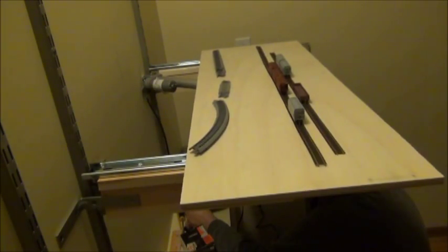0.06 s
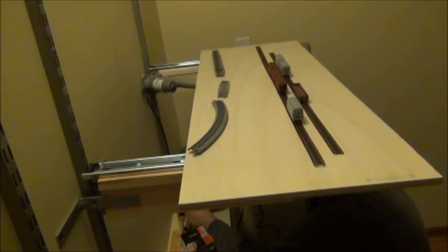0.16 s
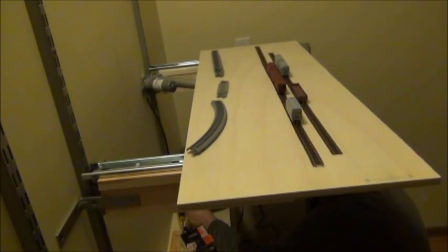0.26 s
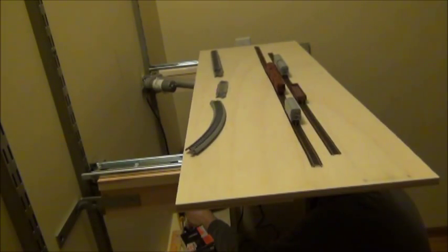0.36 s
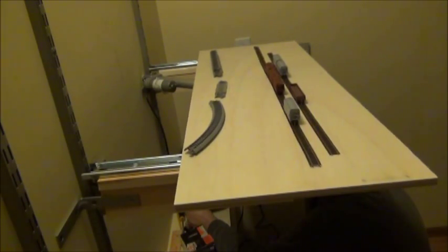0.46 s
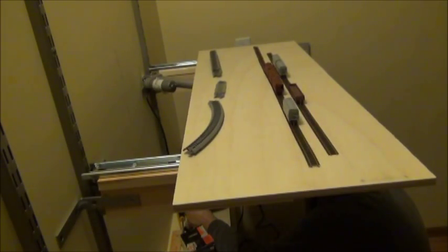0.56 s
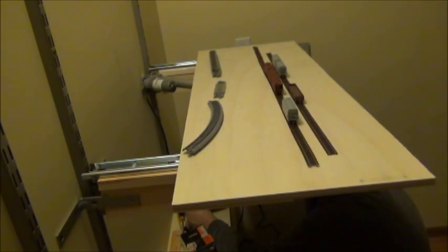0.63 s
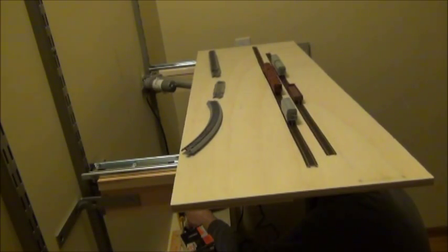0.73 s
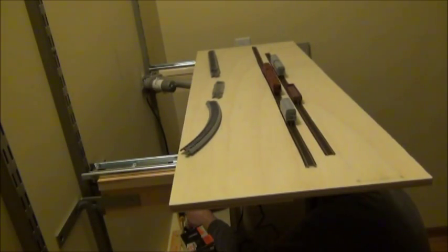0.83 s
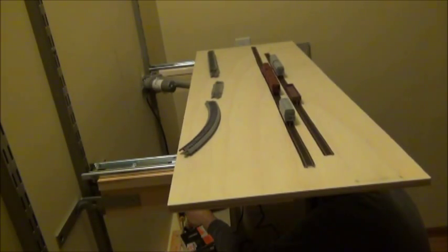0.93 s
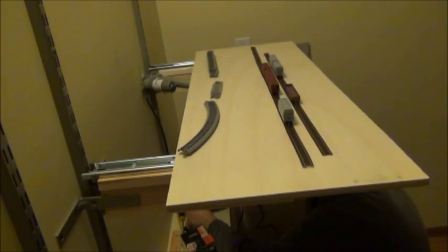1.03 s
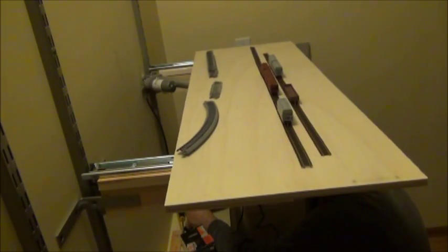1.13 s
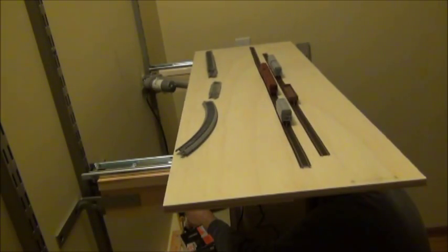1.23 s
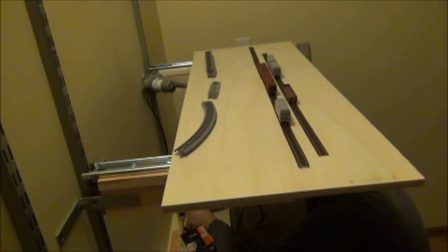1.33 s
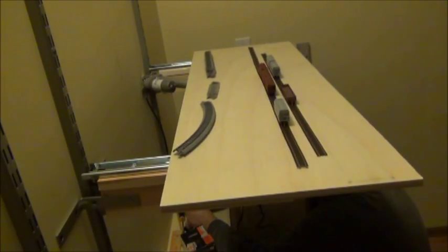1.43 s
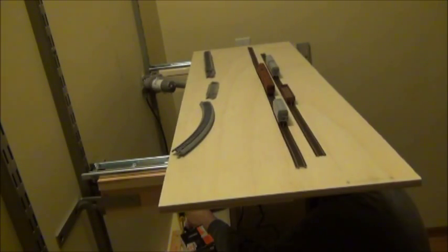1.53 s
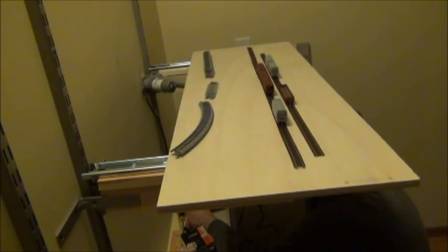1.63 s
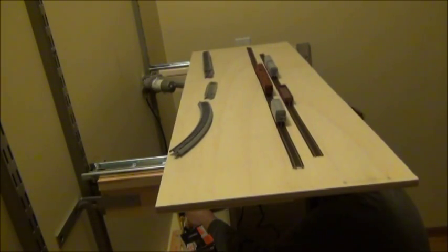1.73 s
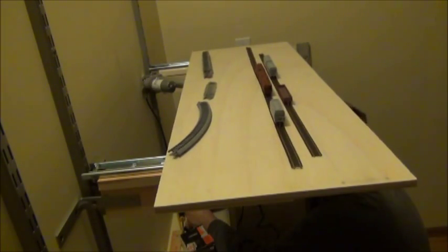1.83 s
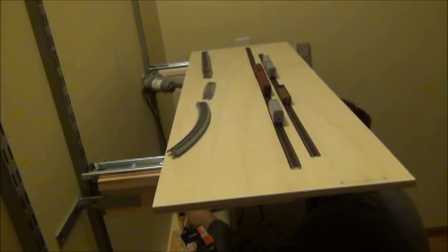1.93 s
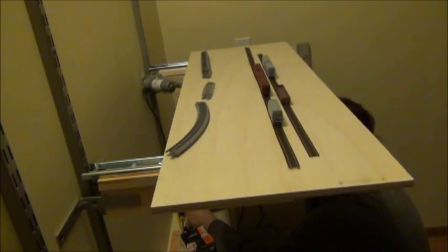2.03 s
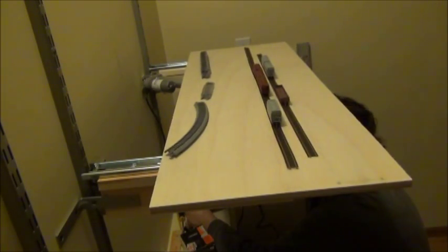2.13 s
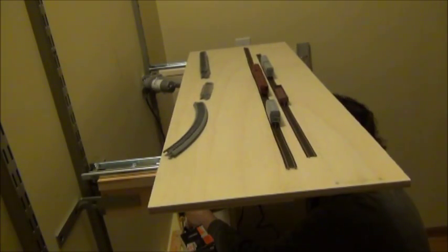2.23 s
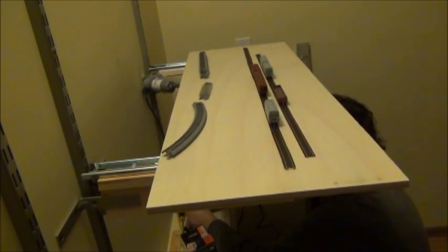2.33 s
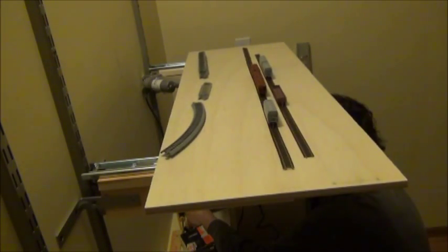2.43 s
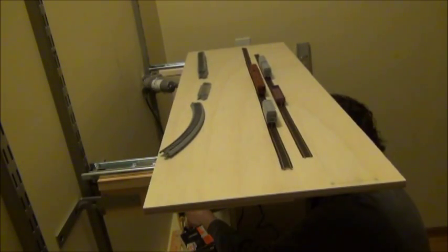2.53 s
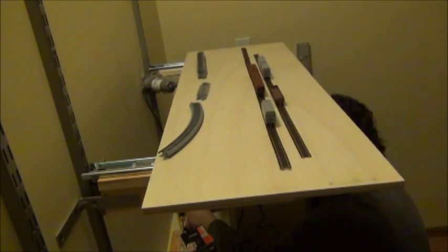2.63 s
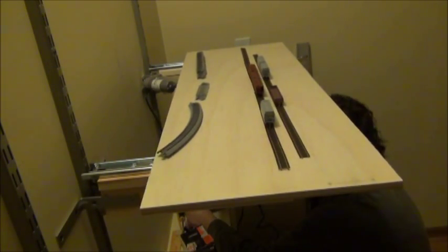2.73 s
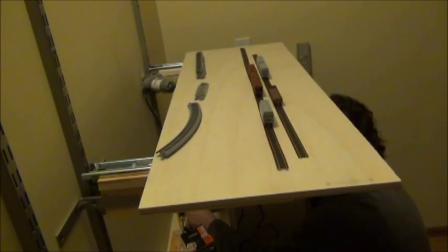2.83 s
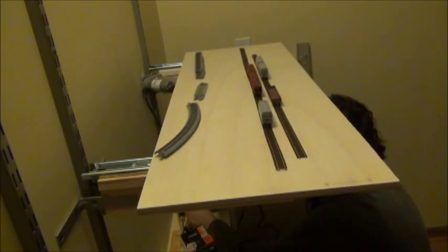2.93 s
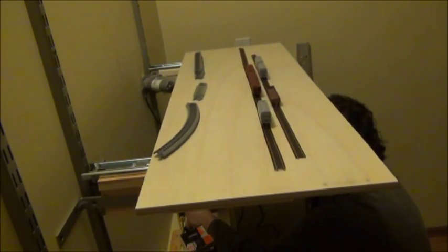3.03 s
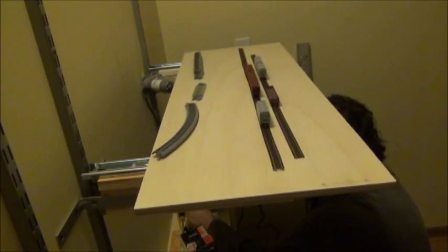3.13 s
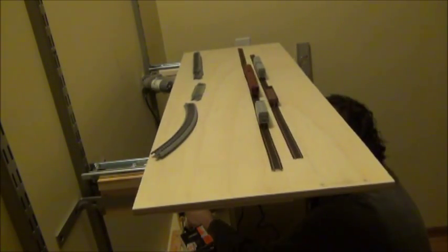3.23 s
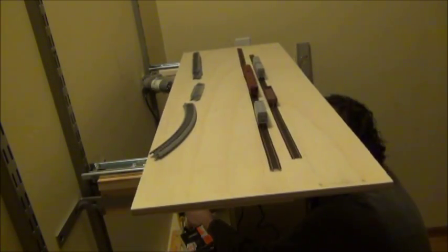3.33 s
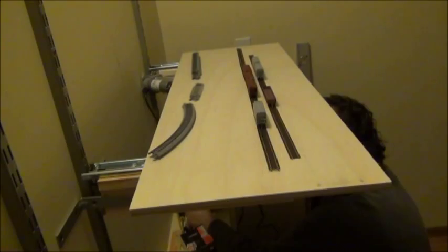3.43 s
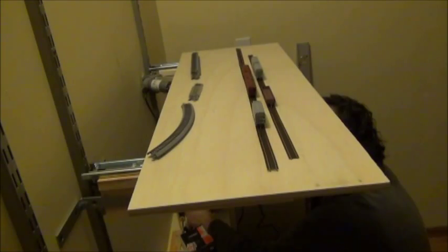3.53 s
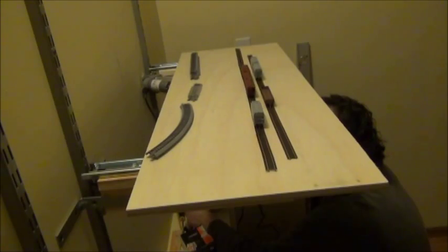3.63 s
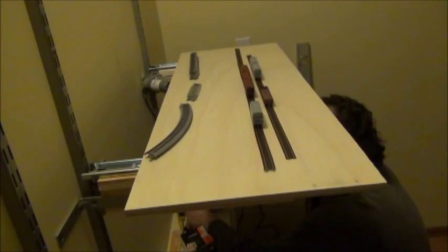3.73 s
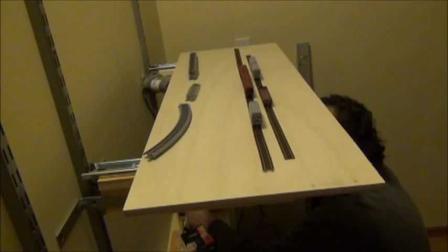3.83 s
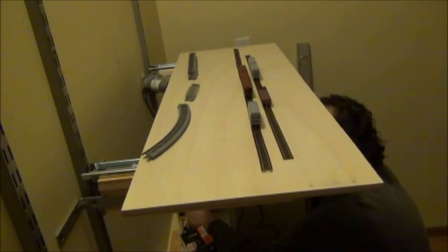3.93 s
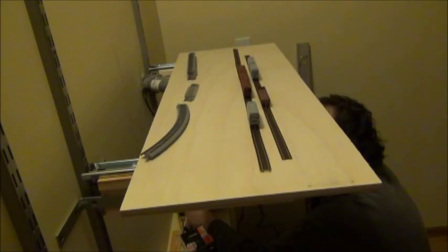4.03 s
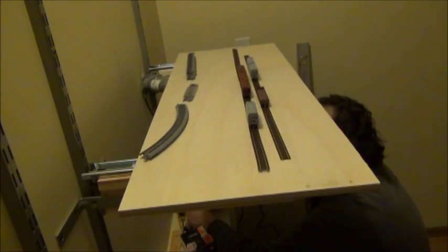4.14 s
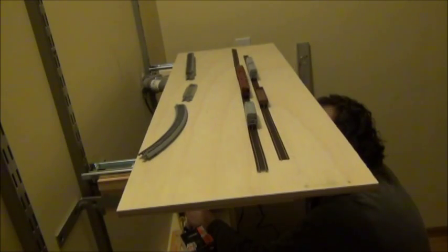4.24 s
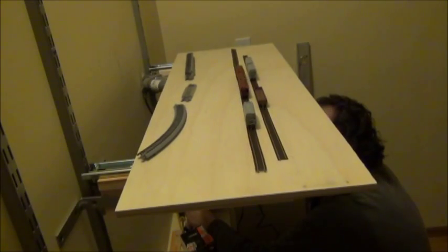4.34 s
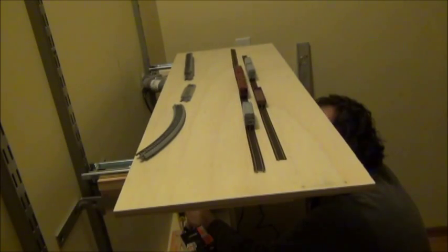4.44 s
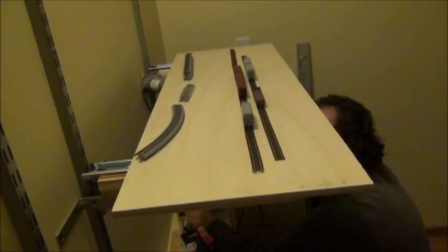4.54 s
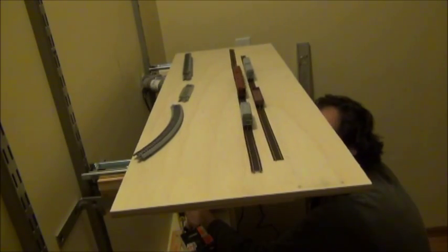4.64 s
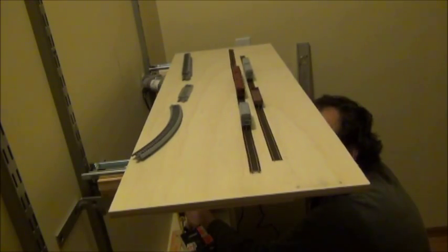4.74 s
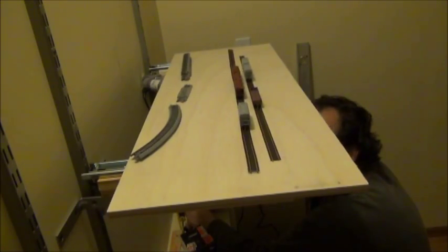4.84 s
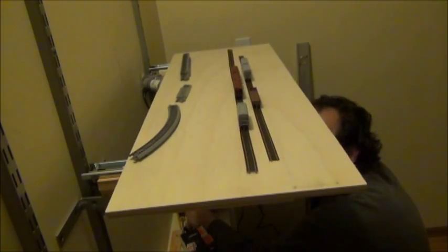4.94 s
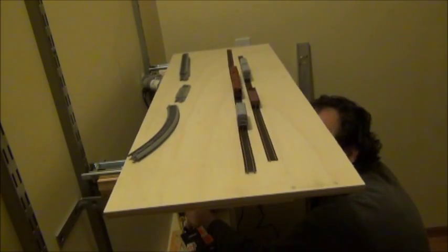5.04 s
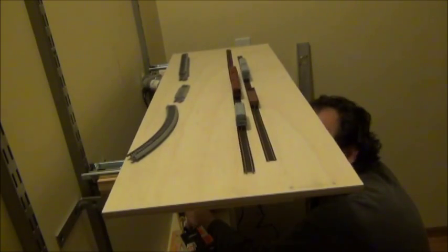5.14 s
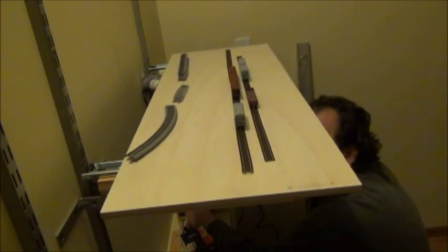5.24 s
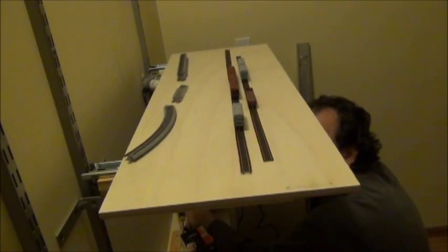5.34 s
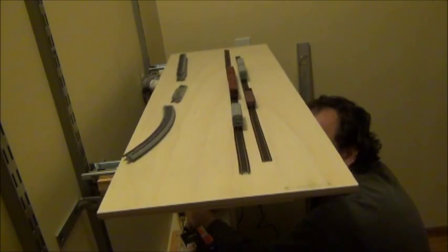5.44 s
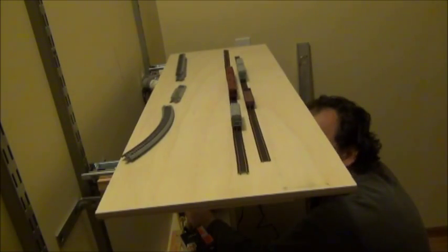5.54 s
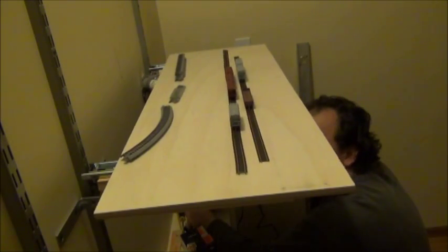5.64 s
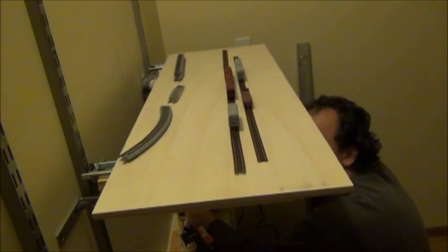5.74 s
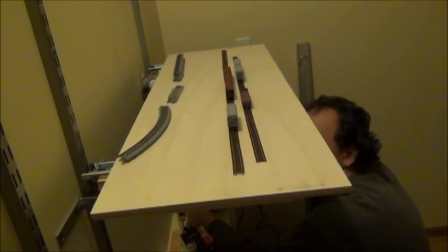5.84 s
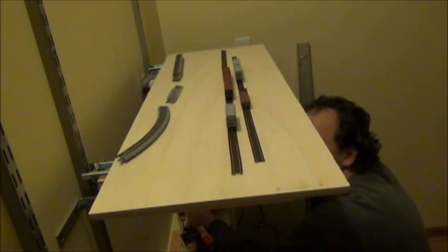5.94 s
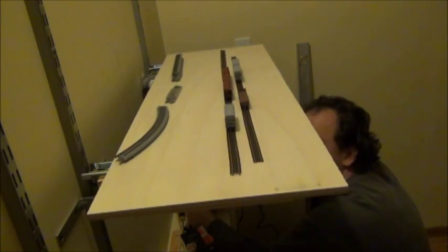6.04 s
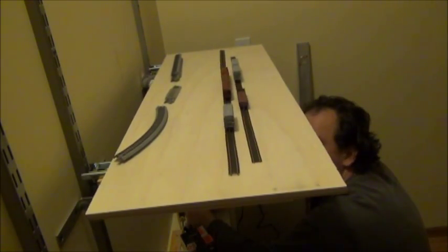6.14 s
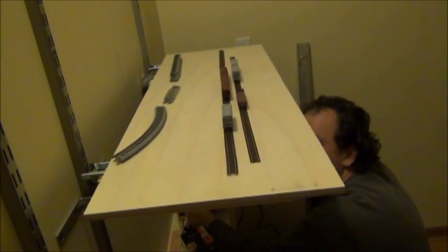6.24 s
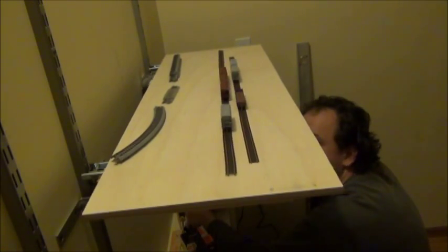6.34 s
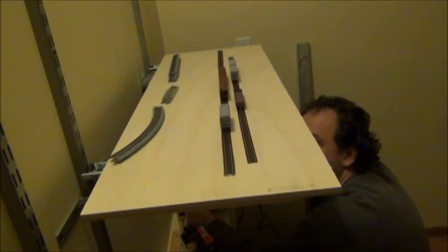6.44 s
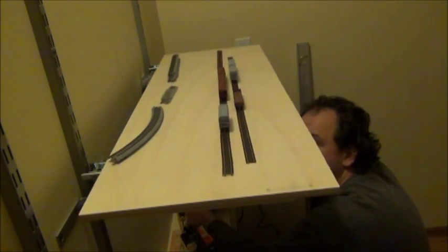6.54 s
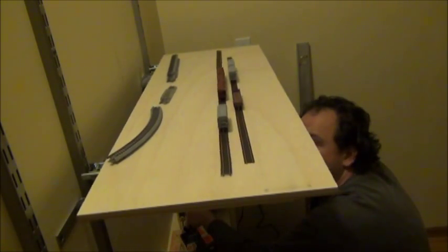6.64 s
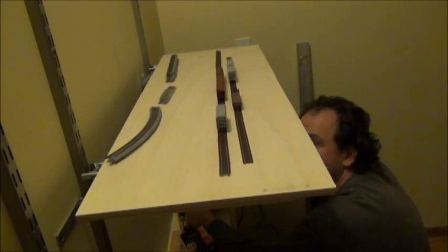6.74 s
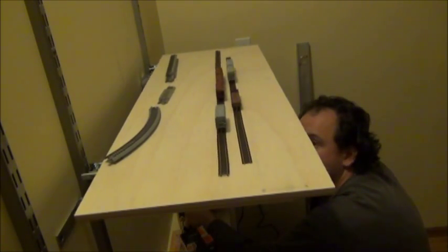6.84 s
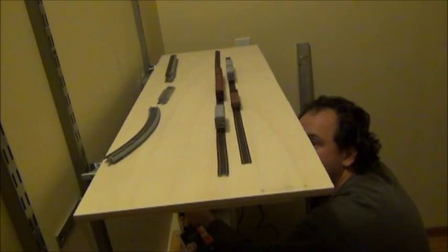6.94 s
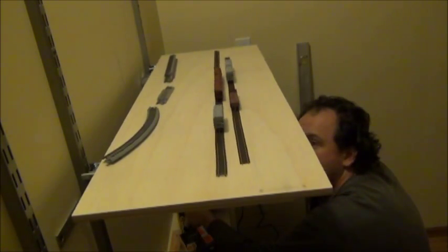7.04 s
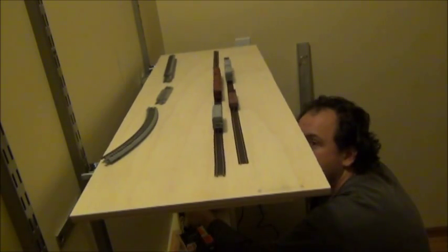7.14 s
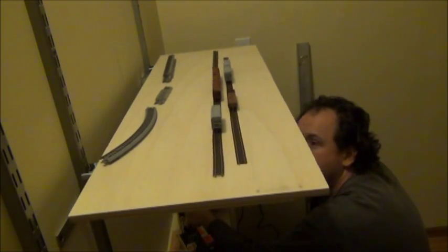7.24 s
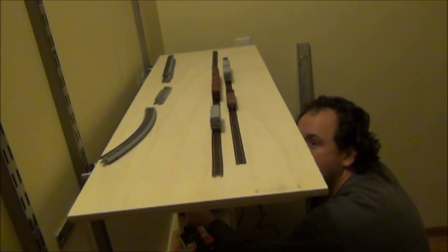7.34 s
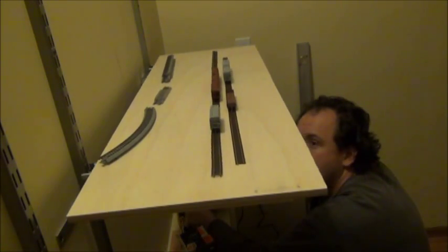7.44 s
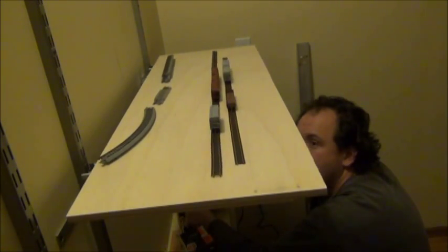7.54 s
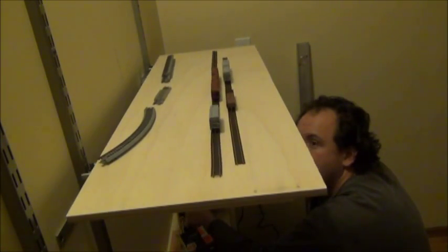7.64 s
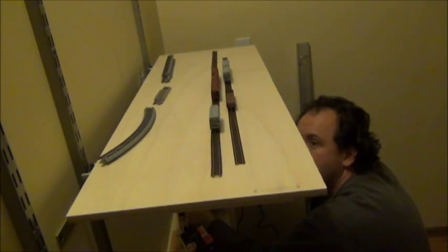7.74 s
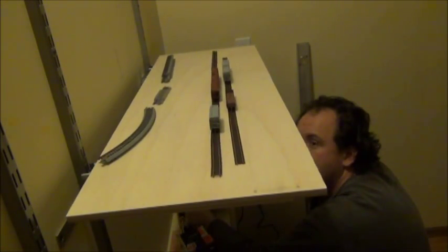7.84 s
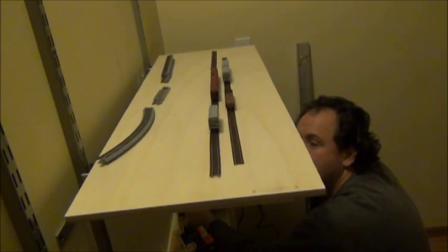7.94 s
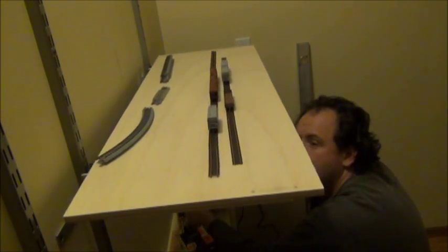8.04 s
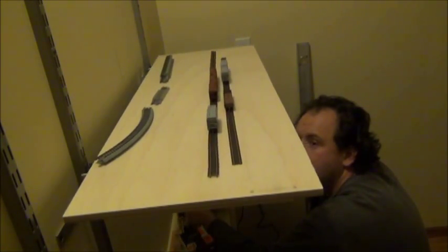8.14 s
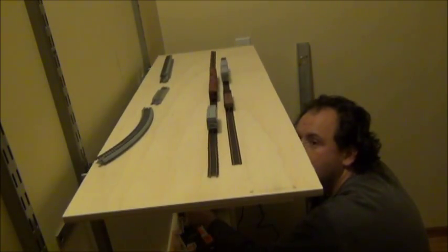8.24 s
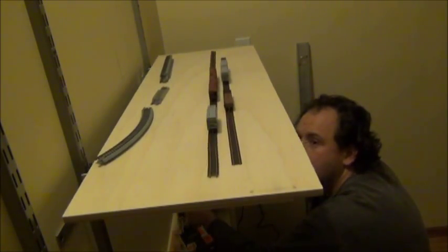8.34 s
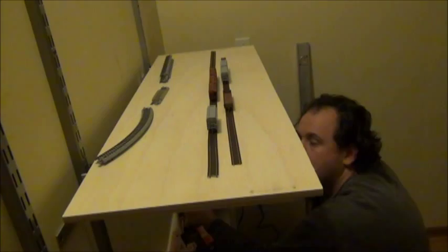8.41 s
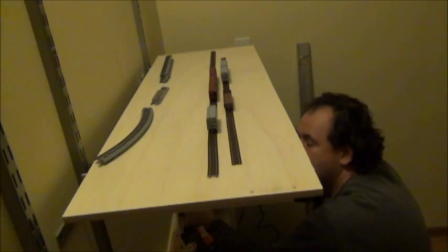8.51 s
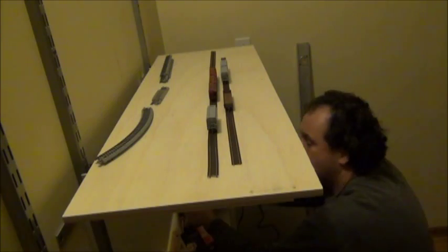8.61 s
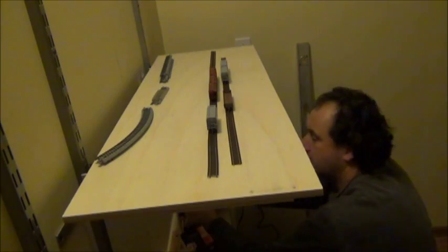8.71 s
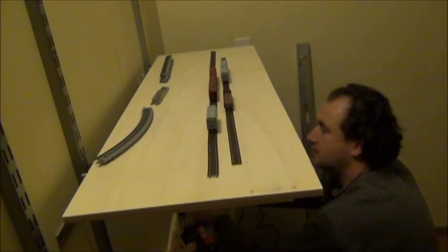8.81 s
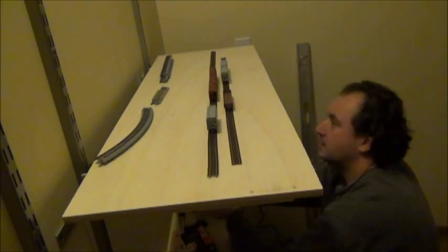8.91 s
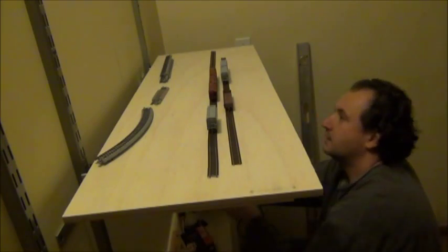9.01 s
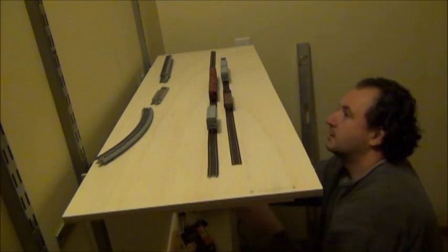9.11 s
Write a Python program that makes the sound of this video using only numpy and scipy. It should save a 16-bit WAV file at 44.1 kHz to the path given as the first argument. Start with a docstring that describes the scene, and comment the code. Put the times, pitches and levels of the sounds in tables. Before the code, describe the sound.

A small geared electric motor whines steadily, coasts down with a rattle, then gives two short bursts as a wooden drawer stops.

```python
"""A small room: a geared electric motor turns a lead screw and draws a wooden drawer in.
Everything that turns repeats with the shaft, so the whine is a comb of shaft orders over brush and
gear hiss. The switch is let go and pressed again twice; each time the motor coasts down, its loose
gears rattling. The drawer thuds softly as the screw halts, and a small scuff comes last."""
import sys
import numpy as np
from scipy import signal
from scipy.fft import rfft, irfft
from scipy.io import wavfile
from scipy.ndimage import uniform_filter1d, map_coordinates

SR = 44100
rng = np.random.default_rng(int(sys.argv[2]) if len(sys.argv) > 2 else 0)


def digitize_waveform(pressure):
    """Quantize a signal to 16-bit integers and store it at the path in sys.argv[1].

    Rows of a 2-D input are taken as channels; values are limited to [-1, 1].
    """
    field = np.atleast_2d(pressure).T
    bounded = np.clip(field, -1, 1)
    quanta = np.round(bounded * 32767).astype(np.int16)
    wavfile.write(sys.argv[1], SR, quanta)


N = 404378
T = np.arange(N) / SR
START_SPEED_HZ, END_SPEED_HZ = 57.42, 57.27   # running shaft speed sags as the drawer comes in
GEAR_TURNS = 5   # shaft turns before the gear pattern repeats


def amp(db):
    """Decibels to gain."""
    return 10 ** (np.asarray(db) / 20)


def rms_one(x):
    """Scale each channel to rms 1."""
    return x / np.sqrt(np.mean(x ** 2, axis=-1, keepdims=True) + 1e-20)


def curve_db(points, hz):
    """Read an EQ curve on a log-frequency axis."""
    points = np.array(points, float)
    return np.interp(np.log(np.maximum(hz, 1)), np.log(points[:, 0]), points[:, 1])


def peaks_db(peaks, hz):
    """Sum of resonance peaks."""
    return sum(db / (1 + (2 * (hz - centre) / width) ** 2) for centre, width, db in peaks)


def butter(x, order, edges_hz, kind):
    """Butterworth filter."""
    return signal.sosfilt(signal.butter(order, edges_hz, kind, fs=SR, output="sos"), x)


def colour(x, db_at):
    """Minimum-phase EQ with the given dB curve; one row per channel."""
    cepstrum = irfft(db_at(np.fft.rfftfreq(8192, 1 / SR)) * np.log(10) / 20)
    cepstrum[1:4096] *= 2
    cepstrum[4097:] = 0
    impulse = irfft(np.exp(rfft(cepstrum)))
    return signal.oaconvolve(np.atleast_2d(x), impulse[None], axes=1)[:, :N]


def drift(rate_hz):
    """Smooth random wander, spread about 1."""
    return map_coordinates(rng.standard_normal(2000), [T * rate_hz], order=3, mode="wrap")


def room_tone(level_db=-50.5, side_db=-7.5):
    """A quiet bed of air and microphone noise, mono in the bass."""
    # Colour of the bed: frequency_hz, relative_db
    air_eq = [(18, -40), (30, -14), (164, -6), (192, -3), (341, -5.5), (852, -5.5), (2300, -13),
              (7080, -19.5), (13600, -20), (15500, -15)]
    air = colour(rng.standard_normal((2, N)), lambda hz: curve_db(air_eq, hz))
    mid, side = amp(level_db) * rms_one(air)
    return mid + amp(side_db) * butter(side, 2, 130, "high") * [[1], [-1]]


def room_reverb(x, t60_s=.52, mid_db=-15.0):
    """Two unrelated diffuse tails: one sits in the centre, the other gives the stereo width."""
    # Side tail against the direct sound: frequency_hz, gain_db
    side_eq = [(60, -26), (110, -34), (200, -38), (380, -19.5), (700, -22.5), (1290, -12.5), (2380, -14.5),
               (4400, -13.5), (8120, -8), (15000, -13.5)]
    t = T[:SR // 2]
    tails = rng.standard_normal((2, len(t))) * amp(-60 * t / t60_s) * (t > .004)
    mid, wide = signal.oaconvolve(x[None], rms_one(tails) / np.sqrt(len(t)), axes=1)[:, :N]
    side = colour(wide, lambda hz: curve_db(side_eq, hz))[0]
    return amp(mid_db) * mid + side * [[1], [-1]]


def scuff(start_s=8.904, length_s=.17, dull_db=-55.0, bright_db=-42.5):
    """A short brushing sound in two noise bands: sharp attack, then dying away."""
    envelope = (T >= start_s) * np.clip(1 - (T - start_s) / length_s, 0, 1) ** 1.6
    out = 0
    for db, edges_hz in ((dull_db, [300, 2000]), (bright_db, [1500, 13000])):
        band = butter(rng.standard_normal(N), 1, edges_hz, "band")
        out = out + rms_one(band) * amp(db) * envelope
    return out


def drawer_thud(start_s=7.715, pitch_hz=224, gain_db=-36.0, attack_s=.012, t60_s=.15):
    """The drawer thuds as the screw halts: one low damped note with a rounded attack."""
    t = np.maximum(T - start_s, 0)
    envelope = amp(gain_db - 60 * t / t60_s) * (1 - np.exp(-t / attack_s))
    return envelope * np.sin(2 * np.pi * pitch_hz * t)


def body_db(hz):
    """Colour that housing, drawer and microphone give the hiss."""
    # Broad hiss spectrum at full speed: frequency_hz, level_db_per_hz
    body_eq = [(25, -86), (45, -84), (70, -86), (150, -80), (300, -73), (750, -70), (1400, -76),
               (1900, -70.5), (3500, -72), (4100, -76), (5200, -77), (6200, -72), (7600, -75.5),
               (8400, -69), (11500, -68.5), (13000, -73.5), (15800, -83)]
    # Housing resonances: centre_hz, width_hz, boost_db
    housing_modes = [(230, 30, 6.5), (455, 40, 4), (560, 60, 3), (740, 70, 5), (910, 50, 3),
                     (1010, 50, 1.5), (1870, 100, 2), (2360, 120, 1.5), (2730, 80, 7), (3450, 160, 3),
                     (6300, 100, 1), (6800, 100, 4.5), (8200, 150, 3), (9600, 150, 3), (10700, 150, 1)]
    return curve_db(body_eq, hz) + peaks_db(housing_modes, hz)


def path_db(hz):
    """Colour of the path that carries whine and rattle out of the housing."""
    # Broad response of the path: frequency_hz, gain_db
    path_eq = [(60, -30), (180, -27), (300, -18), (800, -12), (1200, -14), (1600, -16), (1850, 2),
               (3650, -2.5), (3900, -15), (4150, -5.5), (5000, -10), (6300, -1.5), (7500, -10), (8500, -3),
               (12000, -3), (14000, -10)]
    # Narrow resonances of drawer and frame: centre_hz, width_hz, boost_db
    frame_modes = [(226, 18, 20), (345, 24, 8), (457, 18, 17), (688, 30, 8), (915, 30, 10), (1010, 25, 15),
                   (1900, 100, 4), (2380, 100, 4), (2750, 70, 9), (3440, 90, 6), (6300, 120, 6),
                   (6850, 100, 5), (8350, 120, 6), (9620, 120, 6), (10700, 150, 5)]
    return curve_db(path_eq, hz) + peaks_db(frame_modes, hz)


def motor_motion(spin_up_s=.023, sag_s=3.0):
    """Spin-ups and coast-downs: pace (share of full speed), shaft speed in Hz, and power (0 to 1)."""
    # Switch presses: on_s, off_s, coasting_loss_hz_per_s
    presses = [(-1.0, 6.861, 136), (7.106, 7.322, 133), (8.021, 8.13, 150)]
    full_hz = END_SPEED_HZ + (START_SPEED_HZ - END_SPEED_HZ) * np.exp(-T / sag_s)
    speed_hz, power = np.zeros(N), np.zeros(N)
    for on, off, loss in presses:
        from_hz = speed_hz[max(int(on * SR), 0)]
        driven_hz = full_hz - (full_hz - from_hz) * np.exp(-np.clip(T - on, 0, off - on) / spin_up_s)
        lost_hz = loss * np.maximum(T - off, 0)
        speed_hz = np.where(T >= on, np.maximum(driven_hz - lost_hz, 0), speed_hz)
        power[(T >= on) & (T < off)] = 1
    return np.clip(speed_hz / full_hz, 0, 1), speed_hz, uniform_filter1d(power, size=400)


def backlash(pace, shake_turns=.009, running_slack=.0012):
    """The shaft angle shakes when the gears are not pressed together; a little stays at full speed."""
    return shake_turns * np.sqrt(1 - pace + running_slack) * drift(150.0)


def unbalance(turns, pace, level_db=-52.0):
    """Shaft unbalance: an unsteady hum at twice the turning rate, gone as soon as the motor slows."""
    return amp(level_db + 3.5 * drift(11.0)) * pace ** 8.0 * np.cos(4 * np.pi * turns)


def gear_rattle(pace, gain_db=-12.5, rumble_boost_db=6.5):
    """Loose gears chatter and rumble whenever the motor turns below its running speed."""
    looseness = (1 - pace) ** .5 * pace ** .95
    chatter = butter(rng.standard_normal(N), 1, [450, 2500], "band")
    rumble = butter(rng.standard_normal(N), 2, [300, 1500], "band")
    return amp(gain_db + 1.5 * drift(35.0)) * looseness * (chatter + amp(rumble_boost_db) * rumble)


def friction_hiss(turns, pace, crossover_hz=4500):
    """Gear friction below, brush friction above, throbbing once and twice a turn, fading as it slows."""
    throb = 1 + .18 * np.cos(2 * np.pi * turns) + .25 * np.cos(4 * np.pi * turns + 1.3)
    noise = rng.standard_normal((2, N)) * np.sqrt(SR / 2) * throb
    gear = butter(noise[0], 3, crossover_hz, "low") * amp(.6 * drift(11.0)) * pace ** .8
    brush = butter(noise[1], 3, crossover_hz, "high") * amp(-.8 + .6 * drift(13.0)) * pace ** .75
    return gear + brush


def play_cycle(partials, turns, size=2 ** 16):
    """Build a wavetable of one gear cycle from complex partials and read it at the shaft's angle."""
    cycle = irfft(partials, size) * size / np.sqrt(2)
    return np.interp(turns / GEAR_TURNS % 1 * size, np.arange(size + 1), np.append(cycle, cycle[0]))


def motor_whine(turns, pace, power, bars=12, travel_s=6.84, spread_db=4.2, waver_db=.9, wobble_rad=2.3):
    """Magnetic hum, commutator bar tones and gear partials; their balance morphs as the drawer travels."""
    # Loudest partials at full speed, by drawer position:
    # shaft_order, out_db, one_third_in_db, two_thirds_in_db, in_db
    strong_orders = [(4, -33, -32.5, -32, -31), (6, -35, -30, -34, -38), (8, -39, -40.5, -35, -33),
                     (10, -41, -45, -45, -46), (12, -33, -33, -35.5, -32.5), (16, -40, -56, -40, -36.5),
                     (22, -44, -45, -48, -55), (24, -44, -49, -53, -40), (38, -40, -44, -49, -52),
                     (40, -44.5, -41.5, -41, -43), (47, -41, -39, -38.5, -41), (48, -30, -29.5, -29.5, -28),
                     (49, -46, -39, -38.5, -40), (52, -48, -44.5, -42, -42), (60, -37, -32, -33.5, -35),
                     (72, -38, -31, -32, -34), (96, -41, -41, -40, -44), (108, -58, -44, -37, -47),
                     (120, -48, -39, -39, -40), (142, -48, -45, -40, -45), (144, -39, -42, -42, -39),
                     (146, -50, -40, -39, -35), (156, -52, -54, -41, -43), (158, -43, -38, -39, -46),
                     (168, -49, -46, -42, -32.5), (182, -49, -49, -38, -39), (184, -38, -41, -50, -51),
                     (191, -42, -38, -41, -43)]
    strong = np.array(strong_orders)
    order = np.arange(1400) / GEAR_TURNS
    hz = order * END_SPEED_HZ
    from_bar = np.abs(order - bars * np.round(order / bars))
    is_hum = order <= 30
    is_bar = (from_bar == 0) & ~is_hum

    # The weaker partials follow the hiss colour, lifted by kind; the first match counts.
    kinds, lifts_db = zip((order % 1 > 0, 8.5),   # gear partials between whole orders
                          (from_bar == 1, 17.0),
                          (order % 2 > 0, 13.5),
                          (from_bar == 0, 22.0),
                          (from_bar == 2, 21.0))
    weak_db = body_db(hz) + np.select(kinds, lifts_db, default=18.0) - 4.0 * is_hum

    # Sideband phases wobble the bar tones once a turn: 0 rad leans to tremolo, pi to vibrato.
    phase = np.exp(2j * np.pi * rng.random(len(order)))
    bar_bins = np.arange(2, 22) * bars * GEAR_TURNS
    below, above = bar_bins - GEAR_TURNS, bar_bins + GEAR_TURNS
    phase[below] = np.exp(1j * wobble_rad) * phase[bar_bins] ** 2 / phase[above]

    # Each family ducks in its own way while the motor coasts or spins up.
    coasting, spinning_up = (1 - power) * (1 - pace), power * (1 - pace)
    hum_gain = amp(-40.0 * coasting - 9.0 * spinning_up + waver_db * drift(6.0))
    bar_gain = amp(-.3 * (1 - power) - 60.0 * spinning_up + .7 * drift(1.5))
    rest_gain = amp(-10.0 * coasting - 9.0 * spinning_up + waver_db * drift(9.0))

    travel = np.clip(T / travel_s, 0, 1)
    out = 0
    for position in range(4):
        crossfade = np.maximum(1 - np.abs(3 * travel - position), 0)
        level_db = weak_db + spread_db * rng.standard_normal(len(order))
        level_db[strong[:, 0].astype(int) * GEAR_TURNS] = strong[:, position + 1]
        # The path's EQ cancels at full speed; slower partials sweep through its resonances.
        partials = amp(level_db - path_db(hz)) * phase * (order >= 1)
        for family, gain in ((is_hum, hum_gain), (is_bar, bar_gain), (~(is_hum | is_bar), rest_gain)):
            out = out + crossfade * gain * play_cycle(partials * family, turns)
    return out * pace ** .55


def scene(take_up_s=1.1, take_up_db=-.8):
    """The motor sounds through housing and drawer; thud and scuff join it in the room."""
    pace, speed_hz, power = motor_motion()
    turns = np.cumsum(speed_hz) / SR + backlash(pace)
    whine = motor_whine(turns, pace, power)
    low_hum = unbalance(turns, pace)
    drive = colour(whine + gear_rattle(pace), path_db)[0]
    hiss = colour(friction_hiss(turns, pace), body_db)[0]
    swell = amp(take_up_db * np.clip(1 - T / take_up_s, 0, 1))   # until the screw bears its full load
    direct = (drive + hiss) * swell + low_hum + drawer_thud() + scuff()
    return direct + room_reverb(direct) + room_tone()


def record(dry, cutoff_hz=16050):
    """The image leans slightly left, and a steep low-pass takes off the very top."""
    lowpass = signal.cheby2(14, 70, cutoff_hz, fs=SR, output="sos")
    return signal.sosfilt(lowpass, dry * amp([[.2], [-.2]]))


dry = scene()
out = record(dry)
digitize_waveform(out)
```